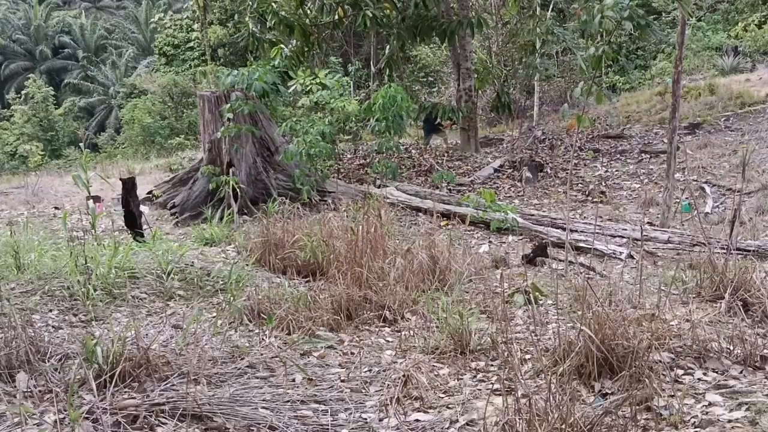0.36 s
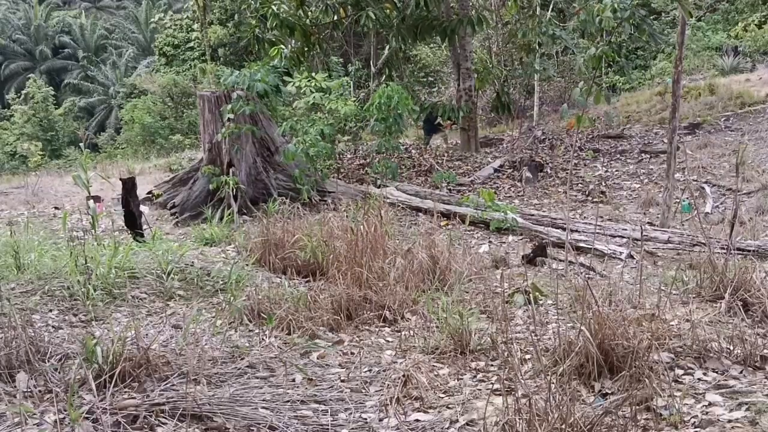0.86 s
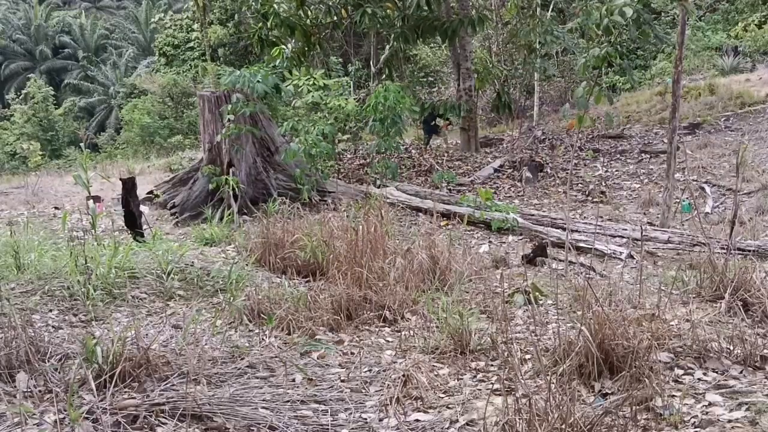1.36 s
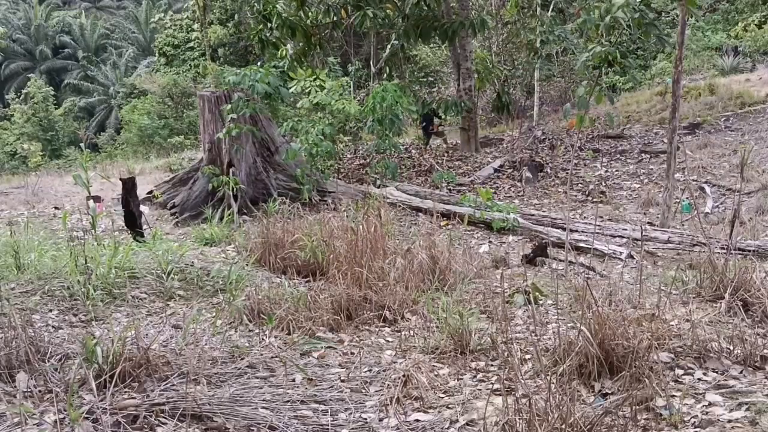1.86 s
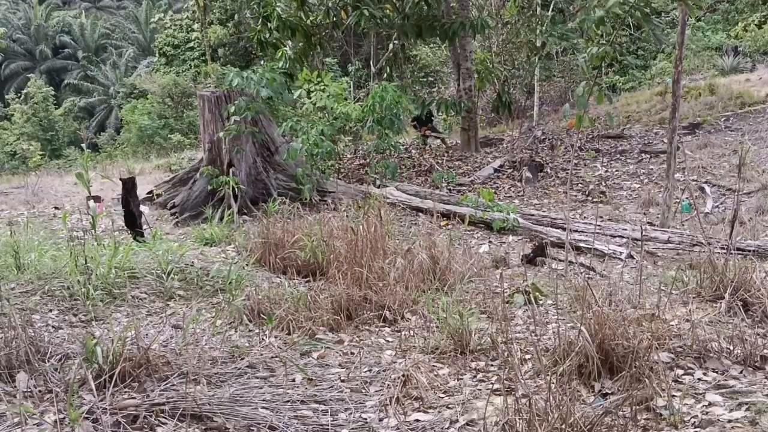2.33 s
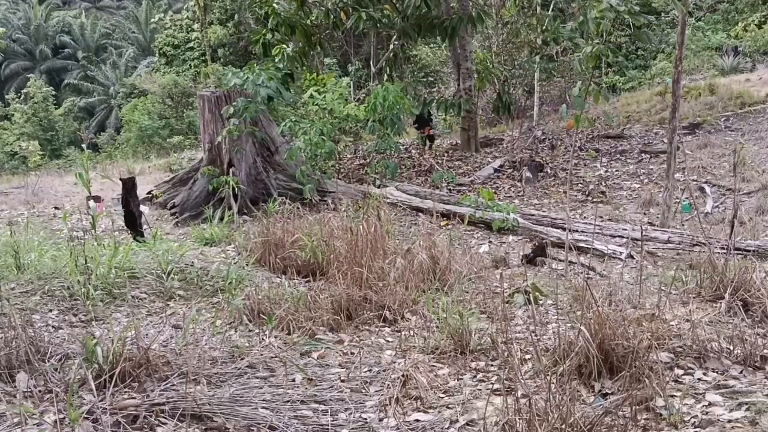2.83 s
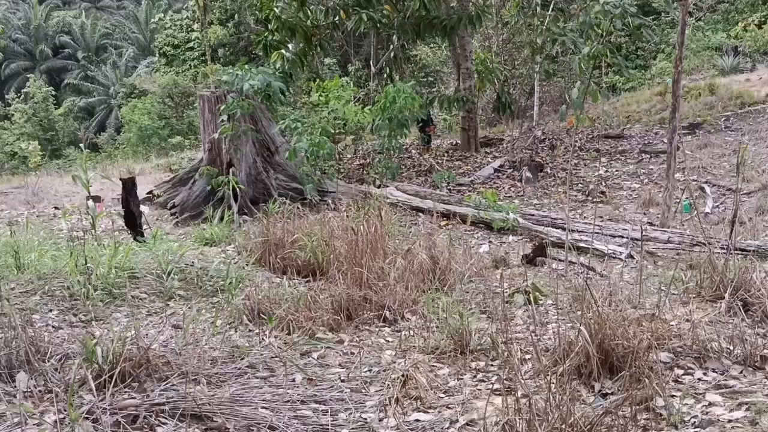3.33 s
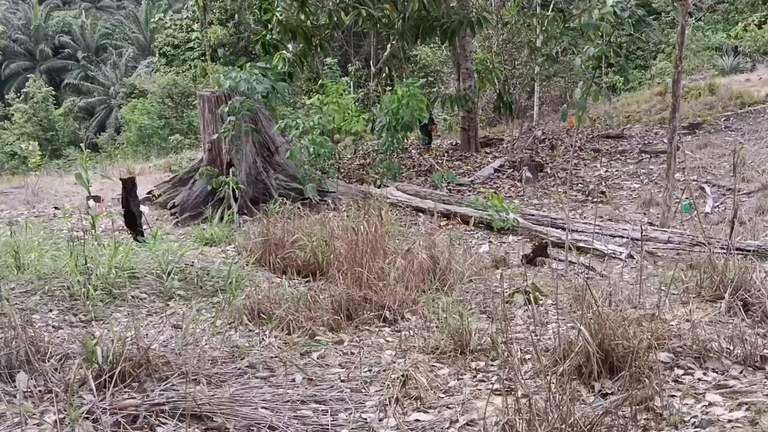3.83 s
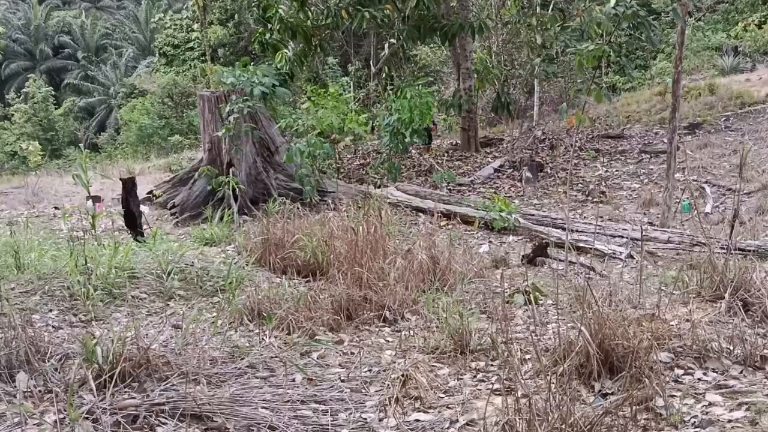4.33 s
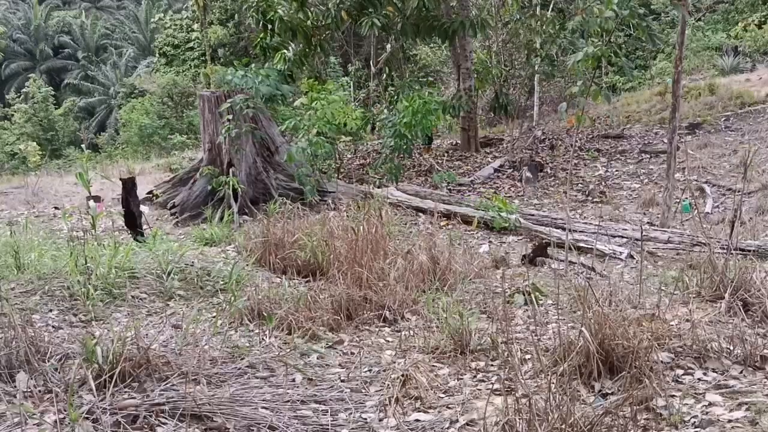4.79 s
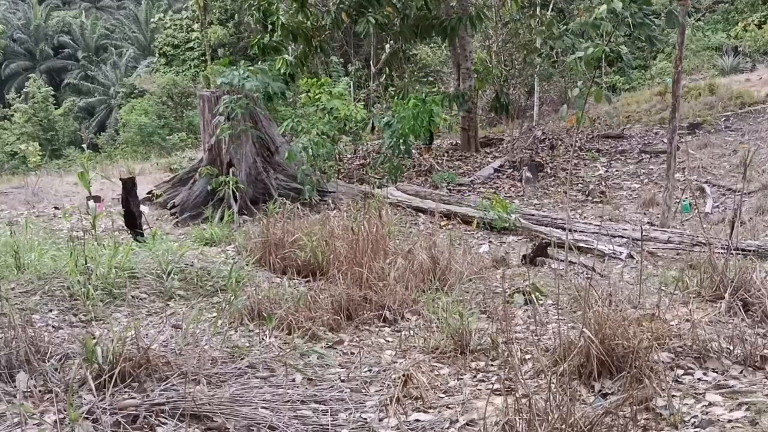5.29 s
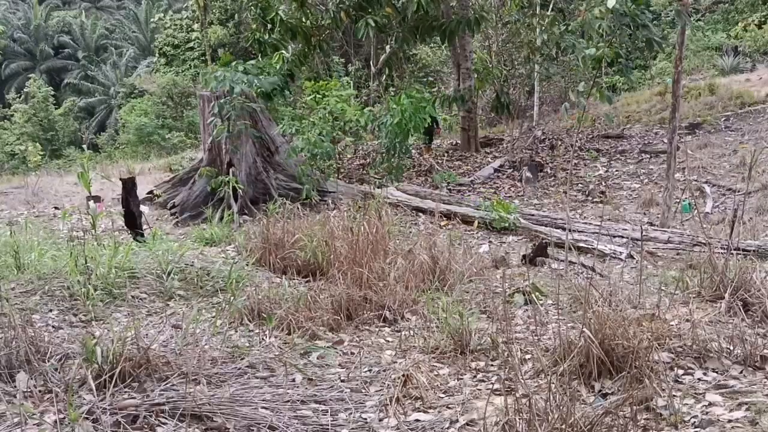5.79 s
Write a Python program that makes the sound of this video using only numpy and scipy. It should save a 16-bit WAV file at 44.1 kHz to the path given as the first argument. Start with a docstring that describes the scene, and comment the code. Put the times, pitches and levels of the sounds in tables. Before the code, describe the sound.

Steady high chainsaw drone with chain hiss, a sudden drop, two quick revs, and a falling, chattering coast-down. The engine putts unevenly, skipping beats, its clutch clanking and jingling, until it slows and stops. Trees and a slope give short scattered echoes. Afterwards only thin wide insect hiss, distant rumble and two tiny nearby ticks are heard in open-air stereo.

```python
"""Chainsaw across a clearing

A two-stroke saw some way from a stereo microphone: full throttle, two blips, then it coasts down with a rattle
to a lumpy idle that fires only on some turns, its clutch clanking, and stalls. Each turn blows through resonances
of crankcase, muffler and outlet; chain, casing and clutch are shaped noise. Trees and slope return the exhaust;
insects hiss, a far rumble lies under all, and two dry ticks sound close by."""
import sys
import numpy as np
from scipy import signal
from scipy.fft import rfft, irfft, next_fast_len
from scipy.io import wavfile
from scipy.ndimage import map_coordinates

SR = 44100
rng = np.random.default_rng(int(sys.argv[2]) if len(sys.argv) > 2 else 0)


def invert_db(level):
    """Linear amplitude ratio for a level in decibels (20 dB per decade), elementwise."""
    return 10 ** (np.asarray(level, dtype=float) / 20)


def to_wav(s):
    """Save 16-bit WAV."""
    ch = np.atleast_2d(s).T  # columns
    pcm = np.round(np.clip(ch, -1, 1) * 32767)  # PCM
    wavfile.write(sys.argv[1], SR, pcm.astype(np.int16))


N = 261072

# idle firings: (time heard [s], muffler peak [dB])
FIRINGS = [(2.3, -26), (2.384, -27.5), (2.429, -25), (2.502, -30.5), (2.629, -39), (2.756, -29.5),
           (2.809, -31), (2.907, -34.5), (2.981, -24), (3.106, -37), (3.183, -30), (3.279, -36.5),
           (3.384, -32), (3.483, -30.5), (3.537, -27.5), (3.593, -26.5), (3.62, -37), (3.679, -30.5),
           (3.737, -27), (3.864, -31), (3.892, -29), (3.921, -28.5), (3.979, -30.5), (4.042, -29),
           (4.103, -27.5), (4.166, -30.5), (4.262, -27), (4.395, -30.5), (4.426, -39), (4.456, -28),
           (4.521, -30), (4.608, -27.5), (4.676, -38)]
# trigger pulls: (pulled [s], released [s])
TRIGGER = [(-.1, .96), (1.085, 1.32), (1.385, 1.535)]
# crankcase and muffler resonances while it revs, for one pass: (centre [Hz], width [Hz])
REV_THUMP = (235, 215)
REV_RING = (568, 290)
# muffler at idle, facing the microphone and turned aside, for one pass: (centre [Hz], width [Hz])
IDLE_MUFFLER = [(619, 297), (547.5, 233)]
# the saw swings round: (time [s], share of the way)
SWING = [(2.9, 0.065), (3.25, 1)]


def unit(x):
    """Scaled to rms 1."""
    return x / np.sqrt(np.mean(x ** 2) + 1e-20)


def along(points, hz, axis=1):
    """One column of a table over frequency, read on a log axis."""
    columns = np.transpose(points)
    return np.interp(np.log(hz + 1), np.log(columns[0] + 1), columns[axis])


def curves(rows, s):
    """The columns after the first, read at values s of the first."""
    first, *columns = np.transpose(rows)
    return [np.interp(s, first, column) for column in columns]


def wobble(rate):
    """A smooth random curve, rate knots a second."""
    knots = rng.standard_normal(int(N * rate / SR) + 4)
    return map_coordinates(knots, [np.arange(N) * rate / SR])


def filtered(x, response):
    """x times a complex response of frequency."""
    size = next_fast_len(x.shape[-1] + 8192)
    spectrum = rfft(x, size) * response(np.fft.rfftfreq(size, 1 / SR))
    return irfft(spectrum, size)[..., :x.shape[-1]]


def modes(table):
    """The causal response of a set of resonances, alternating in sign."""
    def response(f):
        total = 0
        for k, (centre, width, db) in enumerate(table):
            band = 1j * f * width
            total = total + (-1) ** k * invert_db(db) * band / (centre ** 2 - f ** 2 + band)
        return total
    return response


def puff(response, order):
    """What one blow sounds like after passing the resonance order times; peak 1."""
    click = np.eye(1, 2048)[0]
    shape = filtered(click, lambda f: response(f) ** order)
    return shape / np.abs(shape).max()


def blows(s, size, shape):
    """The shape laid down at times s, between samples by a windowed sinc."""
    taps = np.floor(s * SR).astype(int)[:, None] + np.arange(-7, 9)
    offset = taps - s[:, None] * SR
    weights = size[:, None] * np.sinc(offset) * np.cos(np.pi * offset / 16) ** 2
    train = np.bincount(np.clip(taps, 0, N - 1).ravel(), weights.ravel(), N)
    return signal.fftconvolve(train, shape)[:N]


def rush(spectrum, alike):
    """Stereo noise of rms 1; the mid/side balance sets how alike left and right are."""
    def mid_side(hz):
        angle = np.arccos(np.clip(along(alike, hz), -1, 1)) / 2
        return invert_db(along(spectrum, hz)) * [np.cos(angle), np.sin(angle)]
    mid, side = filtered(rng.standard_normal((2, N)), mid_side)
    return unit(np.array([mid + side, mid - side]))


def pan(db):
    """Gains of the two channels, left over right by db."""
    return invert_db([[db / 2], [-db / 2]])


def far_rumble():
    """Low noise from far off wavers slowly; now and then a low lump swells over it."""
    # relative spectrum: (frequency [Hz], density [dB per Hz])
    rumble_spectrum = [(15, -46.5), (25, -34), (65, -13), (97, -19.5), (140, -12.5), (156, -25.5),
                       (204, -17), (350, -36), (460, -61.5), (770, -120)]
    # swells: (time [s], level over the rumble [dB])
    swells = [(2.65, 6), (2.95, 5), (3.19, 6), (3.38, 5), (4.43, 7), (5.33, 9), (5.5, 6), (5.92, 6)]
    base_db, swell_s = -66, .05
    t = np.arange(N) / SR
    level_db = base_db + 3 * wobble(4.0)
    for s, db in swells:
        level_db += db * np.exp(-((t - s) / swell_s) ** 2)
    return invert_db(level_db) * rush(rumble_spectrum, [(55, .92)])


def insects_and_leaves():
    """Nearly steady wide hiss, almost unrelated between the channels."""
    # relative spectrum: (frequency [Hz], density [dB per Hz])
    insect_spectrum = [(150, -30.5), (250, -6), (569, -4.5), (1130, -12.5), (2200, -9), (4150, -17),
                       (5370, -11), (6050, -16), (7820, -2.5), (10100, -14), (11200, -23), (12200, -22),
                       (15000, -36)]
    # mean level [dB]
    insects_db = -62.5
    return invert_db(insects_db + 0.4 * wobble(4)) * rush(insect_spectrum, [(320, 0.22), (3200, 0.029)])


def trees(x):
    """Trunks and slope send back a scattered tail, different on each side; treble and bass decay apart."""
    # scattering: (frequency [Hz], t60 [s], level [dB])
    scattering = [(160, .2, -30), (300, .2, -12), (600, .18, -8), (900, .2, -11), (1600, .25, -8),
                  (4000, .25, -5)]
    hz, t, z = signal.stft(rng.standard_normal((2, SR // 2)), SR, nperseg=256)
    decay = invert_db(-60 * t / along(scattering, hz)[:, None])
    tail = signal.istft(z * decay, SR, nperseg=256)[1]
    tail = filtered(tail / np.linalg.norm(tail[0]), lambda f: invert_db(along(scattering, f, axis=2)))
    delayed = np.pad(x, (320, 0))  # samples
    return signal.fftconvolve(delayed[None], tail, axes=1)[:, :N]


def slope_echoes(x):
    """Two clear echoes off the slope, without their bass."""
    def response(f):
        first = invert_db(-8.5) * np.exp(-2j * np.pi * f * .0107)
        second = invert_db(-13) * np.exp(-2j * np.pi * f * .0165)
        return f ** 4 / (f ** 4 + 380 ** 4) * (first + second)
    return filtered(x, response)


def ticks():
    """Two short dry ticks close to the microphone, each a struck set of resonances."""
    # (time [s], high part's peak before panning [dB], low part over it [dB], left over right [dB])
    tick_rows = [(4.8885, -38.5, -13, -12), (5.3606, -36, -39, 7.5)]
    out = np.zeros((2, N))
    high = puff(modes([(5240, 170, 6), (8570, 3700, -11)]), order=1)
    low = puff(modes([(3400, 89, 0)]), order=1)
    for s, db, low_db, pan_db in tick_rows:
        tick = invert_db(db) * (high + invert_db(low_db) * low)
        out[:, round(s * SR):][:, :len(high)] += tick * pan(pan_db)
    return out


def clutch(beat):
    """Each clank cracks, then the drum's modes jingle on, shaken in step with the turns."""
    # (time [s], level [dB], low modes over high [dB], middle modes over high [dB], t60 before the beat [s])
    clanks = [(2.4984, -47, -30, -25, .78), (2.5496, -57.5, 5.5, -16, .1), (2.6276, -37, -1.5, -20, 0.21),
              (2.7504, -56, 5.5, -18, 0.11), (2.8068, -39, 0, -16, 0.2), (2.9046, -46, -19, -5.5, 0.52),
              (3.03, -45, -9.5, 0.5, 0.35), (3.1084, -45.5, -9, -4, 0.27), (3.1818, -41, 8, 0.5, 0.18),
              (3.2202, -48.5, 0, 3.5, 0.35), (3.267, -45.5, -24, -18, 0.18), (3.381, -43, 3, -7, 0.24),
              (3.4765, -54, -31, -10, .34), (3.5842, -56, -6, -5, 0.31), (3.7367, -42.5, -3.5, -9.5, 0.37),
              (4.2589, -45, -4, -14, 0.31), (4.522, -62.5, -19, 6.5, 0.17)]
    # drum modes in low, middle and high groups: (centre [Hz], width [Hz], level before scatter [dB])
    drum = [
        [(945, 140, -6.5), (1960, 51, -11.5), (2370, 22, 0), (2470, 81, -4), (2894, 55, 6)],
        [(3167, 100, 1), (3606, 68, 1)],
        [(4790, 250, -7.5), (5305, 92, 5), (5610, 120, 0.5), (5765, 110, 2.5), (6580, 130, -2.5),
         (8660, 1200, -14), (9960, 330, -7.5), (12280, 1440, -19.5)],
    ]
    # the first contact: (centre [Hz], width [Hz], level [dB])
    contact = [(5760, 2500, -6.5), (10220, 2500, -9)]
    scatter_db = 4  # each clank excites the modes differently
    clank_top_hz = 13200  # the clanks have little above this
    out = np.zeros((2, N + SR))
    t = np.arange(SR // 3) / SR
    onset = 1 - np.exp(-t / .0035)
    for s, db, low_db, middle_db, t60 in clanks:
        start = round(s * SR)
        shake = invert_db(-60 * t / 0.035) + 0.5 * invert_db(-60 * t / t60) * beat[start:][:len(t)] ** 3.5
        struck = [[(hz, width, level + scatter_db * rng.standard_normal()) for hz, width, level in group]
                  for group in drum]
        parts = []
        for table in struck + [contact]:
            noise = rng.standard_normal((2, len(t)))
            parts.append(unit(filtered(noise[0] + 1.9 * noise, modes(table))))  # partly shared by both sides
        low, middle, high, crack = parts
        jingle = shake * (invert_db(low_db) * low + invert_db(middle_db) * middle + high)
        jingle = jingle + 1.3 * invert_db(-60 * t / 0.026) * crack
        out[:, start:][:, :len(t)] += invert_db(db) * onset * jingle
    return filtered(out[:, :N], lambda f: 1 / (1 + (f / clank_top_hz) ** 12)) * pan(-3)


def rattle(turn):
    """As the saw coasts down its loose casing chatters: resonant noise that jumps up and decays each turn."""
    # loose casing, for one of three passes: (centre [Hz], width [Hz], level [dB])
    loose_casing = [(1290, 340, 0), (1750, 230, -2.5), (2320, 330, -.5), (2780, 230, -1.5),
                    (3450, 500, -2.5), (5300, 800, -3), (9700, 900, -4.5)]
    # (time [s], level [dB])
    rattle_levels = [(1.7, -59.5), (1.9, -47.5), (2.15, -41.5), (2.35, -45.5), (2.43, -55), (2.9, -69.5),
                     (3.4, -84.5)]
    noise = rng.standard_normal((2, N)) + 0.678 * rng.standard_normal(N)
    noise = unit(filtered(noise, lambda f: modes(loose_casing)(f) ** 3))
    level_db, = curves(rattle_levels, np.arange(N) / SR)
    chatter = unit(.3 + np.exp(-2.5 * (turn % 1)))
    return invert_db(level_db) * chatter * noise


def chain_hiss(hiss_db, speed, beat, idle_start_s):
    """Chain, bar and cooling air rush in step with the turns; at idle the chain comes to rest."""
    # relative spectrum: (frequency [Hz], density [dB per Hz])
    air_spectrum = [(40, -22.5), (90, -3.5), (330, -10.5), (800, -2.5), (1300, -8.5), (1950, -3.5),
                    (2350, -4), (2900, -3.5), (3500, -2.5), (4200, -9), (5300, -4.5), (7500, -16.5),
                    (8700, -14), (10300, -20.5), (12000, -16), (15400, -22), (15700, -65.5)]
    # (frequency [Hz], left-right likeness)
    likeness = [(110, 0.59), (1100, 0.34), (3100, 0.21), (9000, 0.05)]
    # a slow chain loses its lower hiss: (mostly gone at [Hz], whole at [Hz]) of shaft speed
    thin_speeds = (62, 115)
    thin_hz, idle_db, fade_db_per_s = 4500, -51, 32
    t = np.arange(N) / SR
    air = rush(air_spectrum, likeness)
    lower = filtered(air, lambda f: 1 / (1 + (f / thin_hz) ** 6))
    air -= np.interp(speed, thin_speeds, [.85, 0]) * lower
    idle_hiss_db = idle_db - fade_db_per_s * (t - idle_start_s)
    level_db = np.where(t < idle_start_s, hiss_db, idle_hiss_db) + 1.42 * wobble(11.72)
    return invert_db(level_db) * beat * air


def load(t, speed):
    """Level of each layer from shaft speed and throttle, with slow unsteadiness."""
    # throttle open, then shut, mean rms levels: (shaft speed [Hz], first order [dB], second order [dB],
    # crankcase thump [dB], muffler ring [dB], outlet bark [dB], rasp [dB], chain hiss [dB])
    open_levels = [(140, -25, -42, -79, -31, -22, -36.5, -31.5), (159, -22, -45, -81, -26, -21, -31, -31.5),
                   (190.3, -18, -41, -80.5, -35, -24, -30, -28)]
    shut_levels = [(48.4, -85, -61, -33.5, -37, -47, -66, -53.5),
                   (60.3, -91, -72, -35.5, -36, -45, -63, -38),
                   (76.3, -77.5, -81, -39, -30.5, -43.5, -70, -39),
                   (99.8, -70, -40, -65, -28, -34.5, -48.5, -35),
                   (120, -46, -41, -85, -27, -32.5, -38, -31.5),
                   (142, -30, -53, -79.5, -27, -26.5, -41, -29.5),
                   (177, -30.5, -61, -79, -25.5, -23.5, -54, -28)]
    # depth for: (first order [dB], second order [dB], thump [dB], ring [dB], bark [dB], rasp [dB])
    waver_depths = [.5, 5, 0, 1.5, 1, .8]
    answer_s = .02  # the throttle's time to answer
    pulled = 0
    for on, off in TRIGGER:
        opening = np.clip((t - on) / answer_s + .5, 0, 1)
        closing = np.clip((off - t) / answer_s + .5, 0, 1)
        pulled = pulled + opening * closing
    db = pulled * np.array(curves(open_levels, speed)) + (1 - pulled) * np.array(curves(shut_levels, speed))
    return db + [depth * wobble(7.95) for depth in waver_depths + [0]]


def idle_turns():
    """Times of all idle turns, spread between firings, then slowing to a stall; and which of them fire."""
    # speed that counts the turns between two firings: (time [s], speed [Hz])
    idle_speed = [(2.3, 47), (2.6, 39), (3.4, 39), (3.7, 35), (4.2, 32), (4.3, 37), (4.45, 32), (4.7, 28),
                  (4.8, 20)]
    port_lead_s = .002  # each blow is laid down this long before its listed time, as the putt swells through the resonances
    stall_s, stall_grows = .034, 1.21  # first turn after the last firing, each next one over it
    stumble_s = .0012  # unevenness of the turns that misfire
    fired = np.array(FIRINGS)[:, 0] - port_lead_s
    counts = np.maximum(1, np.round(np.diff(fired) * curves(idle_speed, fired[:-1])[0])).astype(int)
    fires = np.append(0, np.cumsum(counts))
    stall = fired[-1] + stall_s * np.cumsum(stall_grows ** np.arange(4))
    idle_s = np.append(np.interp(np.arange(fires[-1] + 1), fires, fired), stall)
    misfires = ~np.isin(np.arange(len(idle_s)), fires)
    return idle_s + stumble_s * rng.standard_normal(len(idle_s)) * misfires, fires


def revving(revs_s, speed_at, layers_db):
    """One blow a turn into crankcase, muffler, outlet and casing while the saw revs."""
    # outlet resonance for one pass: (centre [Hz], width [Hz])
    rev_bark = (890, 500)
    # casing modes, the rasp: (centre [Hz], width [Hz], level [dB])
    casing_modes = [(1205, 200, 3.5), (1600, 360, -2), (1648, 270, 0), (2446, 155, -2.5), (2790, 200, -36),
                    (3470, 130, -2), (4440, 210, -10), (5470, 550, -8)]
    shapes = [puff(modes([(*REV_THUMP, 0)]), order=6), puff(modes([(*REV_RING, 0)]), order=6),
              puff(modes([(*rev_bark, 0)]), order=5), -puff(modes(casing_modes), order=1)]
    sound = np.zeros(N)
    for shape, level_db in zip(shapes, layers_db):
        peak = invert_db(level_db) * np.sqrt(SR / speed_at) / np.linalg.norm(shape)  # rms to size of one blow
        luck_db = .9 * rng.standard_normal(len(revs_s))
        sound += blows(revs_s, peak * invert_db(luck_db), shape)
    return sound


def catches():
    """The first charge after a later trigger pull thumps in crankcase and muffler."""
    catch_db, delay_s = -23.5, 0.00424
    pulls_s = np.array(TRIGGER)[1:, 0] + delay_s
    thump = puff(modes([(*REV_THUMP, 0)]), order=6)
    ring = puff(modes([(*REV_RING, 0)]), order=6)
    return blows(pulls_s, invert_db(catch_db) * np.ones(len(pulls_s)), thump + .5 * ring)


def unburnt_gas(idle_s, misfire_db):
    """Every idle turn breathes a short gust of noise through the muffler."""
    gust_db, gust_s = -7, .024  # mean level over a misfire, length
    size = invert_db(misfire_db + gust_db + 2 * rng.standard_normal(len(idle_s)))
    gate = blows(idle_s, size, np.hanning(round(gust_s * SR)))
    turned, = curves(SWING, np.arange(N) / SR)
    sound = np.zeros(N)
    for share, resonance in zip([1 - turned, turned], IDLE_MUFFLER):
        response = modes([(*resonance, 0)])
        noise = filtered(rng.standard_normal(N), lambda f: response(f) ** 6)
        sound += share * gate * unit(noise)
    return sound


def idling(idle_s, fires):
    """Each idle turn thumps the crankcase and rings muffler and outlet, at the putt's level if it fires."""
    # (time [s], misfire reference level [dB], thump peak before load and scatter [dB],
    # mean outlet bark over the muffler [dB])
    idle_levels = [(2.28, -28.5, -26, -8), (2.54, -38, -32, -10), (2.88, -39, -30, -16),
                   (3.05, -32.5, -38, -1.5), (3.27, -34, -32.5, -9), (3.45, -35, -44.5, -32.5),
                   (3.9, -36.5, -39.5, -30.5), (4.2, -38, -48, -24), (4.4, -35.5, -37.5, -31.5),
                   (4.72, -46, -50.5, -25), (4.76, -60, -54, -8), (4.87, -58, -58, -1)]
    # crankcase, then outlet, for one pass: (centre [Hz], width [Hz])
    idle_thump = (220.3, 200)
    idle_bark = (850, 277)
    cushion_db, loaded_db = 3, 1
    thump_luck, ring_luck, bark_luck = rng.standard_normal((3, len(idle_s)))
    misfire_db, thump_db, bark_db = curves(idle_levels, idle_s)
    ring_db = misfire_db - 3 + 2.5 * ring_luck
    ring_db[fires] = np.array(FIRINGS)[:, 1]
    outlet_db = ring_db + bark_db + 2 * bark_luck
    thump_db += 3.7 * thump_luck
    thump_db[fires] -= cushion_db  # a burning charge cushions the thump
    thump_db[fires[1:] - 1] += loaded_db  # the loaded turn before it thumps harder
    turned, = curves(SWING, idle_s)
    sizes = [invert_db(thump_db), invert_db(ring_db) * (1 - turned), invert_db(ring_db) * turned, invert_db(outlet_db)]
    sound = unburnt_gas(idle_s, misfire_db)
    for size, resonance in zip(sizes, [idle_thump, *IDLE_MUFFLER, idle_bark]):
        sound += blows(idle_s, size, puff(modes([(*resonance, 0)]), order=6))
    return sound


def engine():
    """The shaft's turns drive exhaust blows, two sine orders and the chain's hiss."""
    # while it revs: (time [s], shaft speed [Hz])
    shaft_speed = [(0, 179.7), (.12, 184.1), (.26, 185.4), (.7, 185.4), (.82, 188.3), (.955, 187.8),
                   (.98, 176.1), (1.05, 150), (1.085, 138.5), (1.15, 147.8), (1.25, 156.8), (1.32, 162.5),
                   (1.39, 138.5), (1.43, 150.4), (1.49, 162.3), (1.54, 169.1), (1.58, 154), (1.68, 124.2),
                   (1.8, 95.9), (1.91, 80.4), (2.11, 60.5), (2.32, 47.6)]
    t = np.arange(N) / SR
    idle_s, fires = idle_turns()
    speed, = curves(shaft_speed, t)
    first_db, second_db, *layers_db, hiss_db = load(t, speed)
    turns = np.cumsum(speed) / SR
    revs_s = np.interp(np.arange(1, turns[-1]), turns, t)
    revs_s = revs_s[revs_s < idle_s[0] - .01]
    speed_at = np.interp(revs_s, t, speed)
    revs_db = [np.interp(revs_s, t, db) for db in layers_db]
    revs_s = revs_s + .0025 * rng.standard_normal(len(revs_s)) / speed_at  # jitter as a share of a turn
    exhaust = revving(revs_s, speed_at, revs_db) + catches() + idling(idle_s, fires)
    first = invert_db(first_db) * np.sin(2 * np.pi * turns + 1.7)
    second = invert_db(second_db) * np.sin(4 * np.pi * turns + 3.64)
    exhaust = exhaust + np.sqrt(2) * (first + second) * (t < idle_s[0])  # rms to peak
    all_s = np.append(revs_s, idle_s)
    turn = np.interp(t, all_s, np.arange(len(all_s)))
    beat = 1 + 0.043 * np.cos(2 * np.pi * turn - .9)
    return exhaust, chain_hiss(hiss_db, speed, beat, idle_s[0]), beat, turn


def scene():
    """Saw, echoes and surroundings at the microphone; the direct sound reaches the left side first."""
    exhaust, chain, beat, turn = engine()
    left_leads_s = 4e-5
    delays_s = left_leads_s * np.array([[0], [1]])
    direct = filtered(exhaust + slope_echoes(exhaust), lambda f: np.exp(-2j * np.pi * f * delays_s))
    surroundings = far_rumble() + insects_and_leaves() + trees(exhaust)
    return surroundings + ticks() + clutch(beat) + rattle(turn) + chain + direct


def roll_off(x):
    """The treble ends steeply here."""
    return signal.sosfilt(signal.butter(12, 16120, fs=SR, output="sos"), x)


def record(dry):
    """The finished stereo mix as it is kept."""
    return roll_off(dry)


dry = scene()
out = record(dry)
to_wav(out)
```